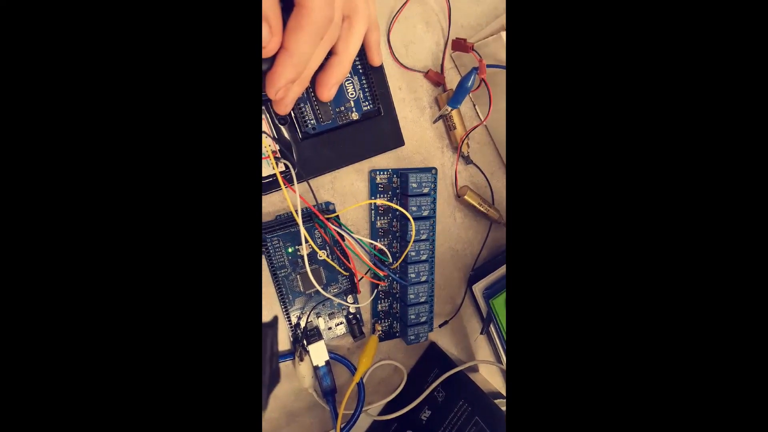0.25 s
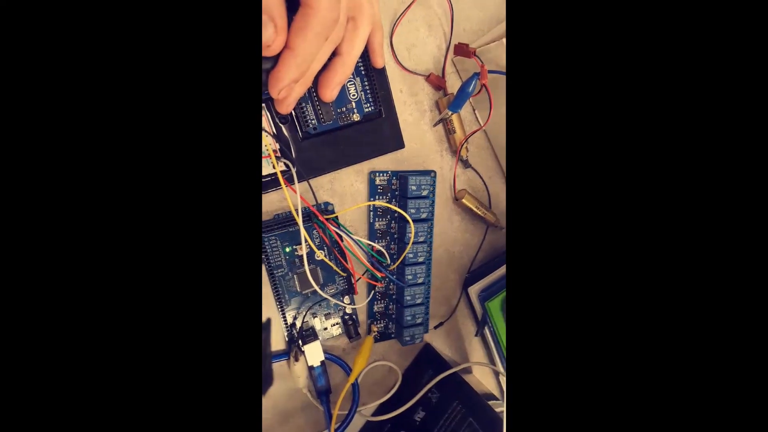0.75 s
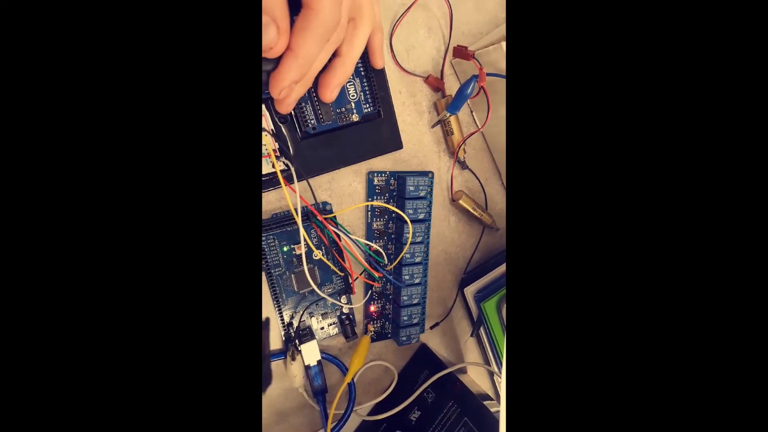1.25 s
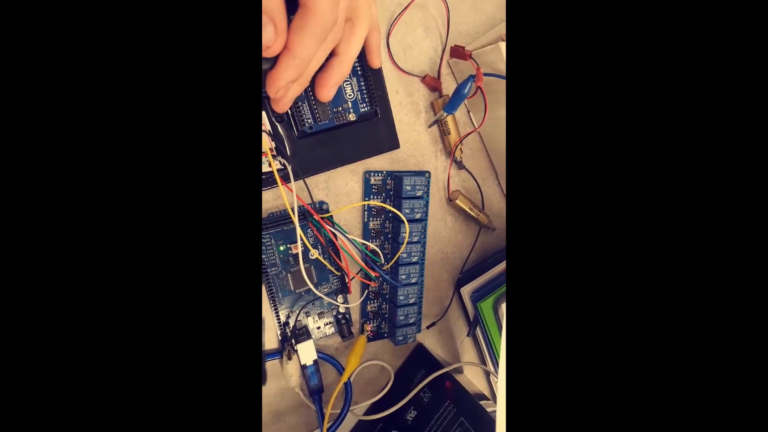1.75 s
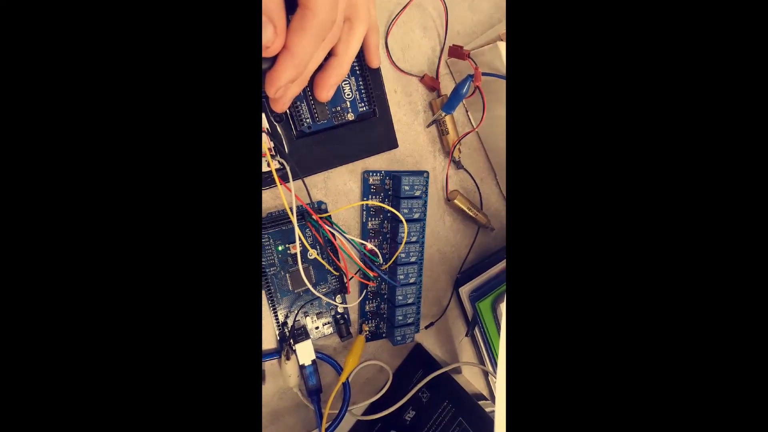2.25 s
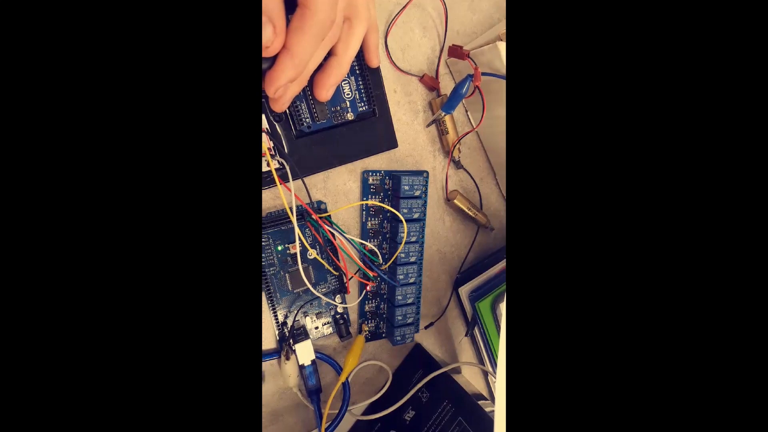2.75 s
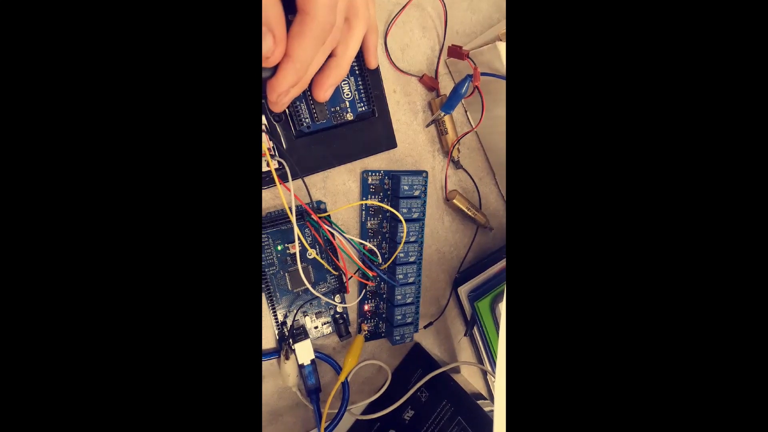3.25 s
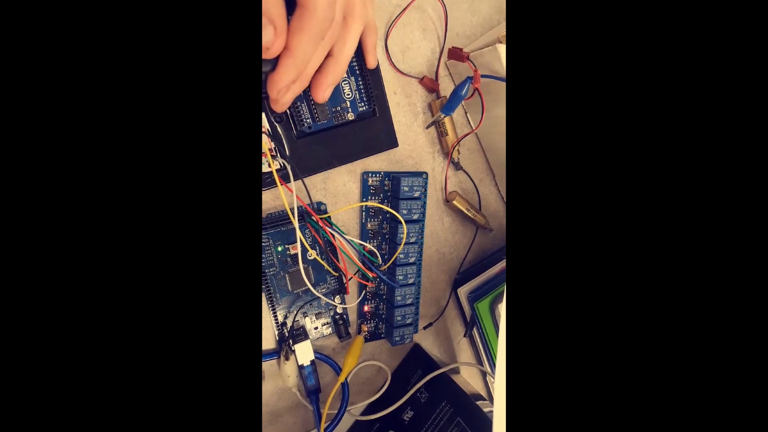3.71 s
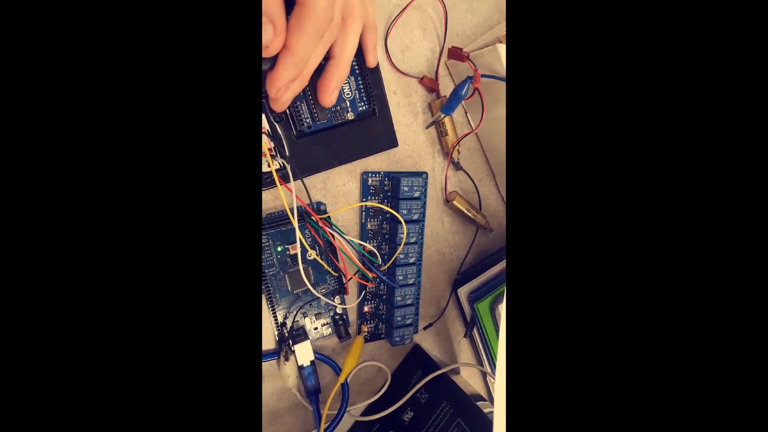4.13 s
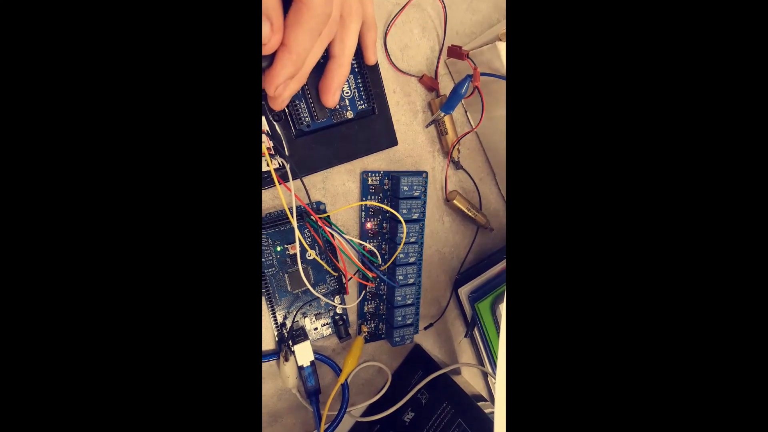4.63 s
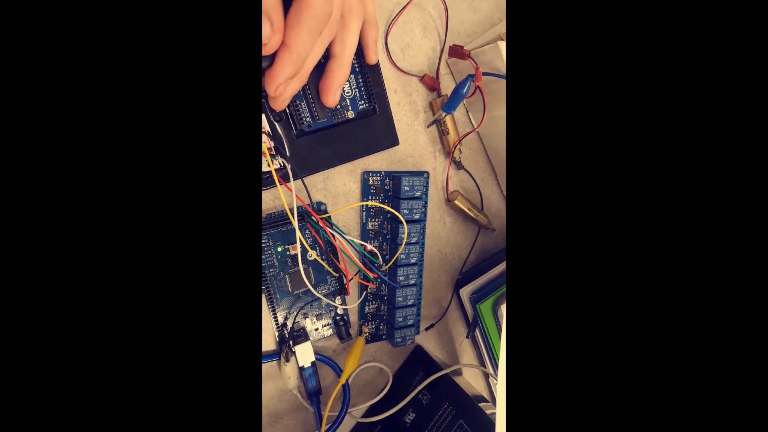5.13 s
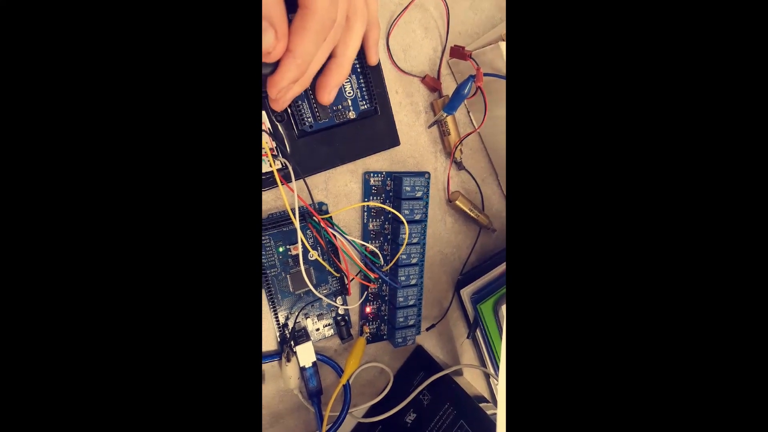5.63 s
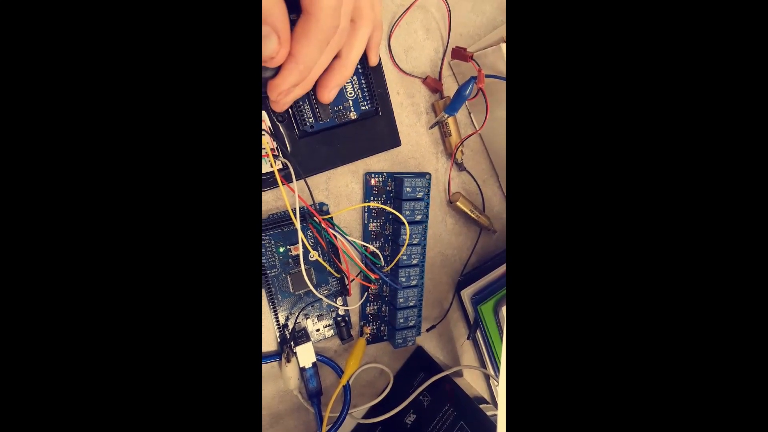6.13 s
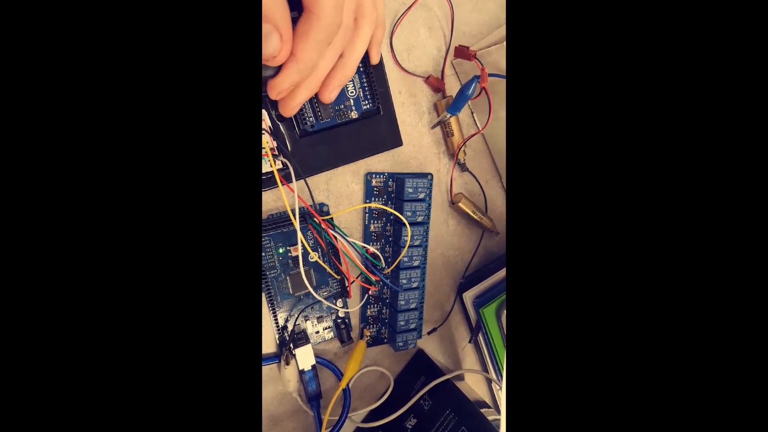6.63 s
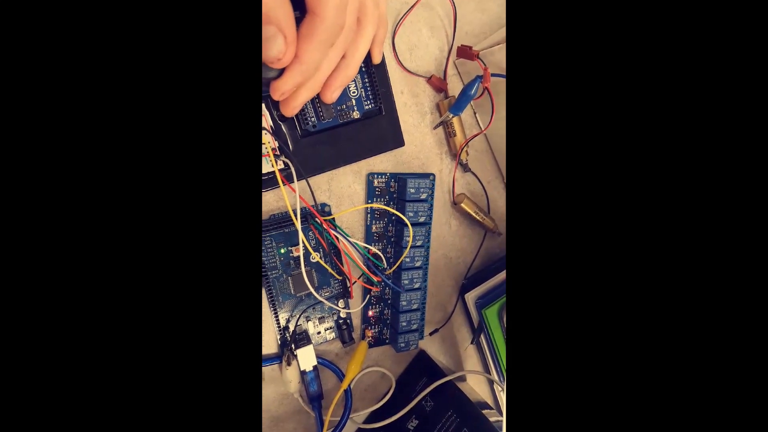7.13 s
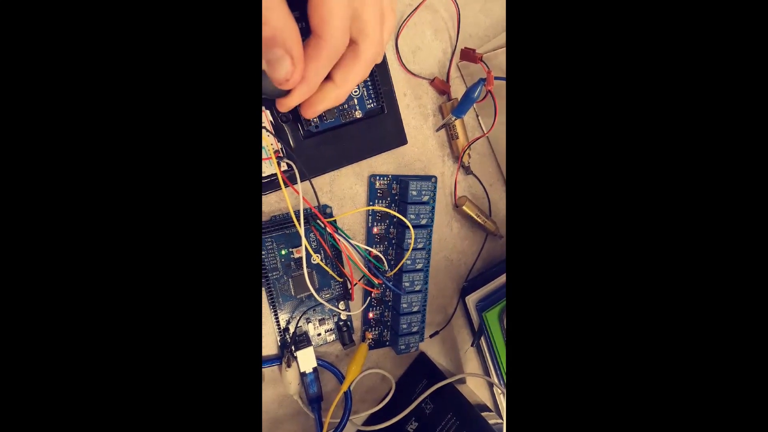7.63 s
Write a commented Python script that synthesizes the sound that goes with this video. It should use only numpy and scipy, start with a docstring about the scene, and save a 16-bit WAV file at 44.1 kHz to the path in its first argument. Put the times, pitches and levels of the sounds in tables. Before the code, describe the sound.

A bank of eight relays on a workbench, heard very close in stereo in a small room. From 0 to 1.5 s, hard bright clicks step evenly at about eleven per second, each followed by a softer, scratchy release tick with a faint spring twang. From 1.5 to 3.4 s the pace roughly doubles, wavering slightly from round to round. A rapid rattle bursts out from 3.4 to 3.85 s, then eases in stages until 4.5 s. Steady quick ticking at about twenty-five per second lasts until 5.8 s, then a fast even rattle runs to 7.4 s and tightens into a near-buzz until about 7.9 s. Dull microphone knocks come around 1.2, 2.7 to 2.9 and 4.4 s. Low rumble with wavering hum falls noticeably at 3.7 s.

```python
"""Eight relays on a workbench board, close stereo microphone, small room: a slow stepping is already under way.
Each relay pulls in with its own bright click and lets go softly half a step later, its spring ringing.
The pace quickens and eases between rounds while a few knocks hit the microphone; the low rumble drops near
halfway, and the board ends in a fast, even rattle. Clicks are struck modes and noise cracks, on the board's
thump; the room answers with hiss, and the rumble is shaped noise with a wavering hum."""
import sys
import numpy as np
from scipy import signal
from scipy.fft import rfft, irfft, next_fast_len
from scipy.io import wavfile

SR = 44100
rng = np.random.default_rng(int(sys.argv[2]) if len(sys.argv) > 2 else 0)


def store_wav(level_fs):
    """Save 16-bit WAV to argv[1]."""
    pcm = np.round(np.clip(np.atleast_2d(level_fs), -1, 1) * 32767)
    wavfile.write(sys.argv[1], SR, pcm.T.astype(np.int16))


N = 346626

# Modes of each relay's armature, yoke and cover, before the stop chokes them and the ports colour them.
# Each row: frequency in Hz, time to fall 60 dB in seconds, left level in dB, right level in dB.
RELAY_1 = [(4540, 0.0031, -35, -10), (5240, 0.054, -18, -16.5), (5300, 0.03, -40, -42),
           (5780, 0.074, -19, -18.5), (6000, 0.0036, -19, -7.5), (6800, 0.018, -1, -4.5),
           (6920, 0.0075, -27, -19), (7500, 0.0089, -31, -2), (7800, 0.0024, -17.5, -31)]
RELAY_2 = [(3880, 0.0038, -1.5, -7), (4870, 0.023, -33, -19), (5730, 0.0069, -19, -5.5),
           (6045, 0.037, -42, -9), (6300, 0.0089, -10.5, -35), (7150, 0.009, -3, -6.5),
           (7090, 0.011, -6.5, -9), (7500, 0.0077, -6, -10.5), (8440, 0.017, -40.0, -40)]
RELAY_3 = [(3760, 0.0077, -4, -16), (5670, 0.011, -38, -26), (5516, 0.0077, -20.1, -1.5),
           (5816, 0.006, -42, 2.5), (6800, 0.0066, -20, -1.5), (7010, 0.0051, 4.5, -18),
           (7120, 0.016, -17, -17), (7800, 0.01, -20, -25), (8340, 0.011, -27, -32)]
RELAY_4 = [(4500, 0.01, -7, -9.5), (5480, 0.0087, -14.5, -5.5), (5750, 0.026, -32, -16),
           (5974, 0.039, -38, -1.5), (6050, 0.021, -40.0, -4.5), (6840, 0.0077, -1.5, -28),
           (7270, 0.0041, -24, -2), (7730, 0.008, -39, -5.5), (8680, 0.003, -11, -17)]
RELAY_5 = [(4440, 0.0016, -2.5, -3.5), (5380, 0.0087, -41, -6.5), (5685, 0.01, -12, 0),
           (5770, 0.02, -30, -4.5), (6330, 0.0058, 1, -2), (7600, 0.01, -11.5, -8),
           (7000, 0.015, -16.5, -16), (8700, 0.0085, -16, -6), (8670, 0.048, -29, -15.5)]
RELAY_6 = [(3560, 0.078, -42, -24.5), (5274, 0.019, -18, -5), (5260, 0.0061, -36, -3),
           (5961, 0.024, -43, -1.6), (6630, 0.016, -11, -9.5), (6750, 0.0056, 3.5, -14),
           (7120, 0.018, -15.5, -15), (7330, 0.005, -5.5, -27), (8660, 0.035, -27, -34)]
RELAY_7 = [(3950, 0.033, -18, -49), (5140, 0.0035, -3, -5), (5380, 0.013, -28, -22),
           (5770, 0.013, -18, -12.5), (6160, 0.046, -14, -17), (6510, 0.0057, 0.5, -17),
           (6930, 0.012, -22, -9), (7680, 0.0076, -32, -5), (7800, 0.0068, -13, -4.5)]
RELAY_8 = [(4290, 0.0038, -0.5, -4.5), (5000, 0.0046, -32, -10), (5540, 0.0093, -12, -12),
           (5897, 0.016, -33, -3), (6250, 0.0053, -2.5, -25), (7030, 0.012, -11, -29),
           (7400, 0.022, -18, -14), (7580, 0.01, -7, -29), (8900, 0.014, -13, -30)]
RELAY_MODES = [RELAY_1, RELAY_2, RELAY_3, RELAY_4, RELAY_5, RELAY_6, RELAY_7, RELAY_8]
# Action of each relay along the board, levels relative.
# Each row: repeat delay in seconds, repeat level in dB, crack level in dB, board thump level in dB,
# crack tilt in dB per octave, drop-out delay in seconds, drop-out level in dB, spring level in dB.
RELAY_ACTIONS = [(.000671, -4.5, 5, -12, 2, 0.012, -12, 0.5), (.001934, -10, 4.5, -9, 0, .0134, -17, -3),
                 (.001898, -12, 5.5, 2.5, -1, .0095, -17, 0),
                 (.001915, -10.5, 5, -6, 1.4, .0125, -18.5, 1.5),
                 (.000626, -36, 6, -13, -1, .0130, -18, 0.5),
                 (.001242, -4.5, 2.5, 0.5, -.5, .0113, -20.5, 4.5),
                 (.001905, -12, 4.5, -7, 0, .0108, -13, -2),
                 (.000744, -9.5, 4.5, -10, 0.5, 0.012, -17.5, 0)]
# Return spring of a freed armature, before each relay's own spring level.
# Each row: frequency in Hz, time to fall 60 dB in seconds, level in dB.
SPRING_MODES = [(390.4, 0.14, -52), (822, 0.16, -53), (1202, 0.069, -55.5)]
# Spectrum of the contact crack at the two ports, levels relative.
# Each row: frequency in Hz, left level in dB per Hz, right level in dB per Hz.
CRACK_SPECTRUM = [(100, -24, -11), (600, -15.5, -8.5), (1210, -7, -7), (1720, -17.5, -12),
                  (3130, -11.5, -8.5), (3630, -5, -0.5), (6000, -5.5, -1), (8060, -0.5, -0.5),
                  (10320, -9, -11), (11500, -3.5, -4.5), (13300, -5, -6), (16000, 1.5, -14),
                  (15800, -14, -19)]
# Colour of the room's answer. Each row: frequency in Hz, relative level in dB.
ROOM_COLOUR = [(150, -8), (1000, 5), (3000, 4.5), (5000, -1.5), (7000, -3.5), (9000, -1), (15000, -5.5)]
# Knocks on the microphone housing. Each row: start in seconds, peak level at the left port in dB.
KNOCKS = [(1.1763, -20), (1.2230, -23.5), (1.2244, -13), (1.2390, -31), (2.728, -24), (2.75, -24),
          (2.8867, -17.5), (4.4259, -15)]
# Spectrum of the room rumble. Each row: frequency in Hz, relative level in dB per Hz.
RUMBLE_SPECTRUM = [(20, -26), (50, -9.5), (100, 0.5), (140, -1), (200, -1), (280, -3.5), (380, -5),
                   (550, -17.5), (1000, -20.5), (2500, -30.5), (16000, -31.5)]
# Wavering hum within the rumble. Each row: frequency in Hz, level in dB relative to the rumble setting.
HUM_LINES = [(100, -8.5), (198, -8.5)]
# Stepping programme: each relay in turn is on for one dwell, then all rest for one.
# Each row: rounds of the board, dwell in seconds (before the controller's overhead).
PACES = [(3, .045), (1, .024), (1, .021), (1, .027), (1, .025), (1, .022), (3, .009), (1, .012), (1, .013),
         (1, .016), (4, .020), (11, .009), (1, .007), (5, .005)]

# the first round is already under way; the controller needs a moment of its own for every step
FIRST_STEP_S, STEP_OVERHEAD_S = -.65545, .000171
# a relay repeats its blow closely: spread of the board thump (dB) and of the spring's pitch (share)
THUMP_SPREAD_DB, SPRING_DETUNE = 1.0, .011
# the rumble holds its level, then falls once to a quieter one
RUMBLE_LOUD_DB, RUMBLE_QUIET_DB, RUMBLE_FALL_AT_S, RUMBLE_FALL_S = -50.5, -62, 3.68, 0.12
CUTOFF_HZ = 17000
CLICK_T = np.arange(SR // 8) / SR  # time within one click, s


def relays(chatter_s, pull_sag_db, drop_sag_db, thump_sag_db):
    """The relays take turns, each powered for half a step; every doubling of speed weakens the blows."""
    on, off = switching()
    doublings = np.log2(0.023 / (off - on))  # relative to a 23 ms dwell
    thump = board_thump()
    out = np.zeros((2, N))
    for k, (modes, action) in enumerate(zip(RELAY_MODES, RELAY_ACTIONS)):
        shapes = mode_shapes(modes, left_lag=.00008)
        tilt_db, drop_s, drop_db, spring_db = action[4:]
        cracks = crack_variants(tilt_db, t60=0.017, change=0.53, count=6)
        for turn in range(k, len(on), len(RELAY_ACTIONS)):
            own_crack = rng.choice(cracks)
            pull_db = rng.normal(0, 0.71) - pull_sag_db * doublings[turn]
            jolt = from_db(-thump_sag_db * doublings[turn]) * thump
            add(out, from_db(pull_db) * pull_in(shapes, action, own_crack, jolt), on[turn])

            drop_sag = drop_sag_db * doublings[turn]
            release = drop_out(shapes, own_crack, chatter_s, chatter_db=-6.0, count=6)
            add(out, from_db(drop_db - drop_sag) * release, off[turn] + drop_s - chatter_s)
            twang = spring(SPRING_DETUNE) * from_db([[1], [-2]])
            twang_db = spring_db + rng.normal(0, 2.4) - drop_sag
            add(out, from_db(twang_db) * twang, off[turn] + drop_s)
    return out


def switching():
    """Times at which the coils are switched on and off: a step lasts two dwells and the overhead."""
    rounds, dwell_s = np.transpose(PACES)
    step_s = np.repeat(2 * dwell_s + STEP_OVERHEAD_S, rounds.astype(int) * len(RELAY_ACTIONS))
    on = FIRST_STEP_S + np.cumsum(step_s) - step_s
    return on, on + step_s / 2


def pull_in(shapes, action, own_crack, thump):
    """The armature slams home and jolts the board.

    A second, mostly weaker copy of the blow follows within 2 ms, in several relays probably an echo
    off the table."""
    repeat_s, repeat_db, crack_db, thump_db = action[:4]
    click = from_db(crack_db + rng.normal(0, 1.44)) * own_crack
    click = click + from_db(thump_db + rng.normal(0, THUMP_SPREAD_DB)) * thump
    add(click, strike(shapes, spread_db=0.28), 0)
    repeat = from_db(repeat_db + rng.normal(0, 2.6)) * strike(shapes, spread_db=2.0)
    add(click, repeat, repeat_s + rng.normal(0, .000012))
    return click


def drop_out(shapes, own_crack, chatter_s, chatter_db, count):
    """The freed armature rattles on its back contact; soft touches favour the early-listed, mostly lower modes."""
    click = np.zeros_like(own_crack)
    soft = shapes * from_db(np.linspace(3, -5, len(shapes)))[:, None, None]
    soft = soft * from_db(-60 * CLICK_T[:soft.shape[-1]] / 0.023)  # the resting contact damps the ring
    add(click, from_db(5.5) * own_crack, chatter_s)
    add(click, from_db(-5) * strike(soft, spread_db=3.0), chatter_s)
    # light touches scatter on both sides of the main one
    for touch in 2 * chatter_s * (np.arange(count) + rng.random(count)) / count:
        add(click, from_db(chatter_db) * strike(soft, spread_db=5.0), touch)
    return click


def spring(detune):
    """The return spring twangs, each mode at a slightly different pitch every time."""
    return sum(from_db(db) * ring(hz * (1 + detune * rng.standard_normal()), t60)
               for hz, t60, db in SPRING_MODES)


def strike(shapes, spread_db):
    """One blow: every mode takes a strength of its own."""
    strengths = from_db(rng.normal(0, spread_db, len(shapes)))
    return np.tensordot(strengths, shapes, 1)


def mode_shapes(modes, left_lag):
    """Each mode as heard through two microphone ports that have their own resonances."""
    # the armature settles against its stop and chokes the ring
    damping = np.exp(-(CLICK_T / .011) ** 2)
    shapes = []
    for k, (hz, t60, left_db, right_db) in enumerate(modes):
        sign = (-1) ** k
        left = resonance(damping * ring(hz, t60, left_lag), 7200, 1000)
        right = resonance(damping * ring(hz, t60), 5730, 1440)
        shapes.append([sign * from_db(left_db) * left, sign * from_db(right_db) * right])
    return np.array(shapes)[..., :SR // 40]


def crack_variants(tilt_db, t60, change, count):
    """Dense, quickly dying modes of contacts and board: one relay's own pattern, varied a little each time."""
    hz, left_db, right_db = np.transpose(CRACK_SPECTRUM)
    slope_db = tilt_db * np.log2(np.maximum(hz, 2000) / 6500)
    fade = (1 - np.exp(-CLICK_T / 0.00021)) * from_db(-23.5 - 60 * CLICK_T / t60)
    pattern = rng.standard_normal((2, 1, len(CLICK_T)))
    white = pattern + change * rng.standard_normal((2, count, len(CLICK_T)))
    left = coloured(white[0], np.c_[hz, left_db + slope_db])
    right = coloured(white[1], np.c_[hz, right_db + slope_db])
    return fade * np.stack([left, right], axis=1)


def board_thump():
    """The jolted board pushes the air at each port, and the bench below it booms."""
    left, right = from_db(-24.5) * push(320, 706, 1020), from_db(-39.0) * push(160, 410, 730)
    # a small board radiates no deep bass
    high_pass = signal.butter(2, 55, "high", fs=SR, output="sos")
    return signal.sosfilt(high_pass, -np.array([left, right])) + bench(hz=100, t60=0.15, level_db=-58.5)


def bench(hz, t60, level_db):
    """The bench top booms faintly under each jolt, as one decaying mode."""
    return from_db(level_db) * ring(hz, t60) * from_db([[0], [-4]])


def room(x, wet_db, t60, echo_db):
    """A diffuse tail of decaying noise reaches both ports, with two smeared echoes from near surfaces."""
    t = np.arange(SR // 2) / SR
    tail = np.clip((t - .003) / 0.0009, 0, 1) * from_db(wet_db - 60 * t / t60)
    echoes = sum(from_db(echo_db) * np.exp(-((t - delay) / 0.00046) ** 2) for delay in (.0112, .0218))
    answer = coloured(rng.standard_normal((2, len(t))), ROOM_COLOUR) * (tail + echoes)
    crossed = x + 0.36 * x[::-1]  # each side also excites the other
    return signal.fftconvolve(crossed, answer, axes=1)[:, :N]


def bumps():
    """The holding hand knocks the housing, near the left port: each knock is a low pressure pulse."""
    out = np.zeros((2, N))
    knock = push(68, 155, 1850) * from_db([[0], [-14]])
    for s, db in KNOCKS:
        add(out, from_db(db) * knock, s)
    return out


def rumble():
    """Low room noise, partly shared by the ports, with a wavering hum; both drop near halfway."""
    air = 0.97 * noise(RUMBLE_SPECTRUM, N)
    air = air + 0.5 * np.array([noise(RUMBLE_SPECTRUM, N), noise(RUMBLE_SPECTRUM, N)])
    for hz, hum_db in HUM_LINES:
        # narrow-band noise wavers as a hum does
        line = resonance(resonance(rng.standard_normal(N), hz, 24), hz, 24)
        air = air + from_db(hum_db) * line / line.std()
    fallen = np.clip((np.arange(N) / SR - RUMBLE_FALL_AT_S) / RUMBLE_FALL_S, 0, 1)
    level_db = RUMBLE_LOUD_DB + fallen * (RUMBLE_QUIET_DB - RUMBLE_LOUD_DB)
    return air * from_db(level_db) * from_db([[1], [-4]])


def ring(hz, t60, delay=0):
    """A mode struck after a delay: a sine falling 60 dB in t60 seconds."""
    t = np.maximum(CLICK_T - delay, 0)
    return np.sin(2 * np.pi * hz * t) * from_db(-60 * t / t60)


def push(hz, width_hz, soft_hz):
    """A pressure pulse of height 1 with a slow swing back: a softened, heavily damped resonance."""
    impulse = 1. * (CLICK_T == 0)
    low_pass = signal.butter(2, soft_hz, fs=SR, output="sos")
    pulse = signal.sosfilt(low_pass, resonance(impulse, hz, width_hz))
    return pulse / pulse.max()


def resonance(x, hz, width_hz):
    """Two-pole band-pass with a gain of about 1 on top."""
    r = np.exp(-np.pi * width_hz / SR)
    feed_forward = (1 - r * r) / 2 * np.array([1, 0, -1])
    feedback = [1, -2 * r * np.cos(2 * np.pi * hz / SR), r * r]
    return signal.lfilter(feed_forward, feedback, x)


def noise(spectrum, size):
    """Coloured noise of rms 1."""
    x = coloured(rng.standard_normal(size), spectrum)
    return x / x.std()


def coloured(x, spectrum):
    """Shape a sound by (Hz, dB) points, joined along log frequency."""
    hz, db = np.transpose(spectrum)
    size = next_fast_len(2 * x.shape[-1])
    log_hz = np.log(np.maximum(np.arange(size // 2 + 1) * SR / size, 1))
    gain = from_db(np.interp(log_hz, np.log(hz), db))
    return irfft(rfft(x, size) * gain, size)[..., :x.shape[-1]]


def from_db(db):
    """Decibels to gain."""
    return 10 ** (np.asarray(db) / 20)


def add(out, sound, at_s):
    """Mix a stereo sound in at a time; whatever lies outside is cut off."""
    at = round(at_s * SR)
    sound = sound[:, max(-at, 0):]
    part = out[:, max(at, 0):][:, :sound.shape[-1]]
    part += sound[:, :part.shape[-1]]


def scene():
    """The board in its room, with handling and rumble."""
    board = relays(chatter_s=.0038, pull_sag_db=0.6, drop_sag_db=2.2, thump_sag_db=0.27)
    return board + room(board, wet_db=-45.5, t60=0.33, echo_db=-47.5) + bumps() + rumble()


def record(dry):
    """Full scale clips the peaks, then a steep low-pass cuts the top."""
    low_pass = signal.cheby2(14, 60, CUTOFF_HZ, fs=SR, output="sos")
    return signal.sosfilt(low_pass, np.clip(dry, -1, 1))


dry = scene()
out = record(dry)
store_wav(out)
```